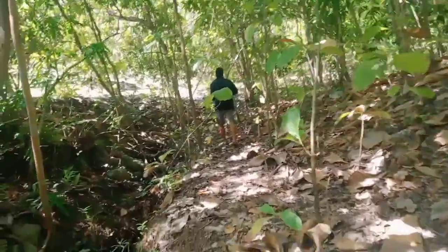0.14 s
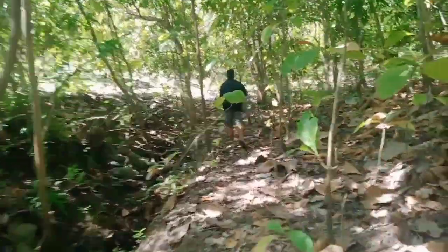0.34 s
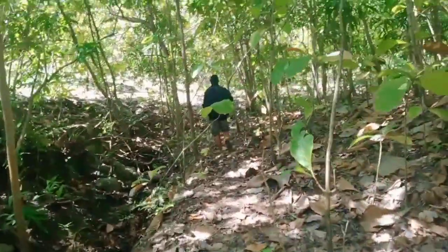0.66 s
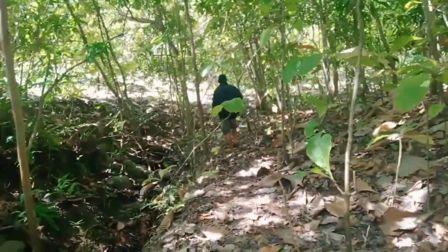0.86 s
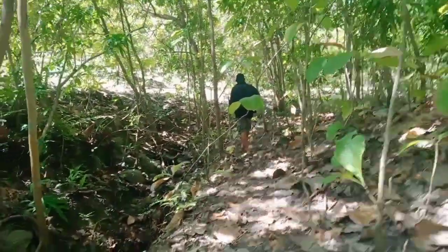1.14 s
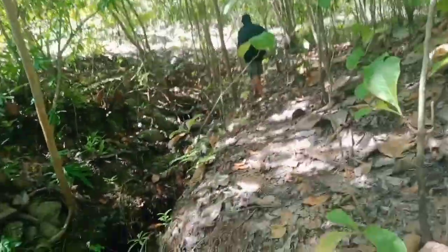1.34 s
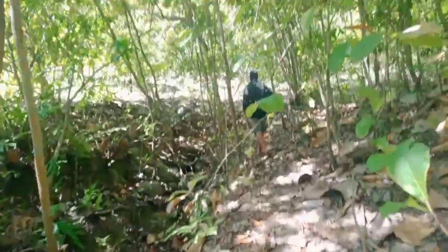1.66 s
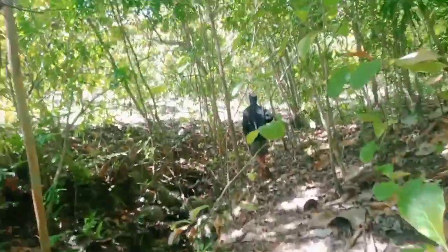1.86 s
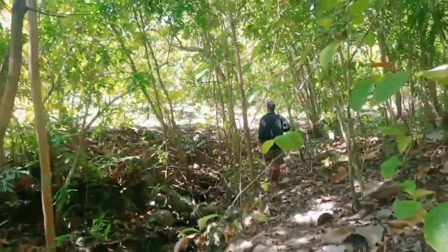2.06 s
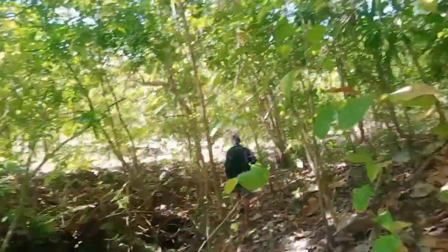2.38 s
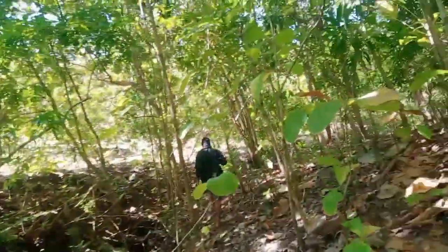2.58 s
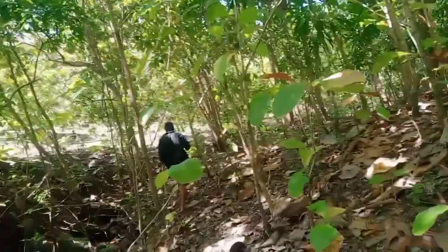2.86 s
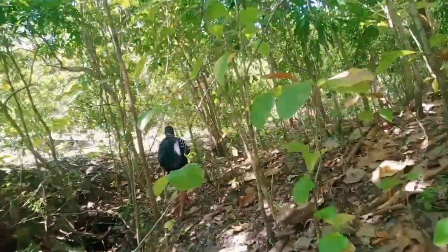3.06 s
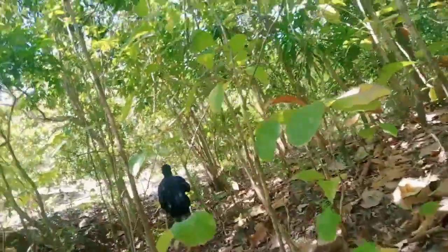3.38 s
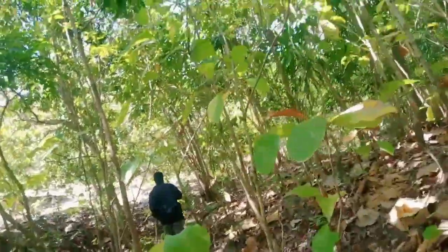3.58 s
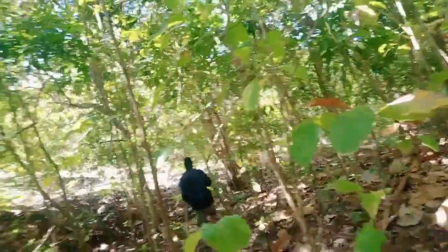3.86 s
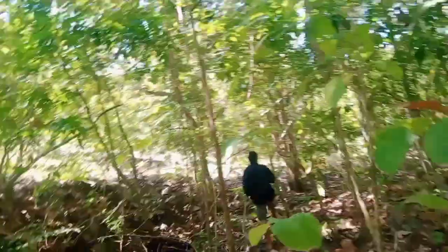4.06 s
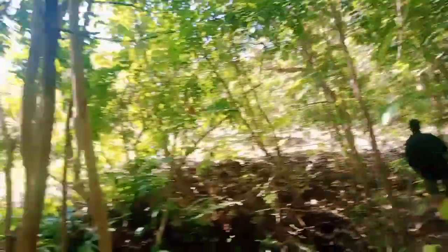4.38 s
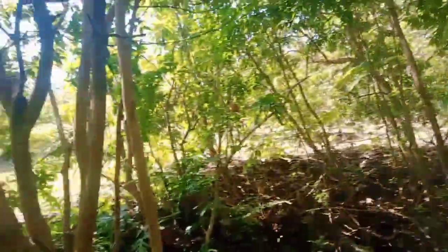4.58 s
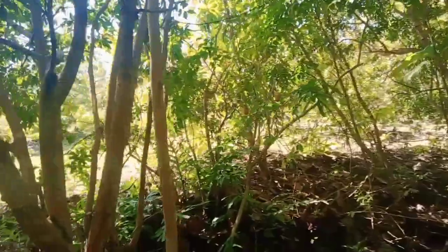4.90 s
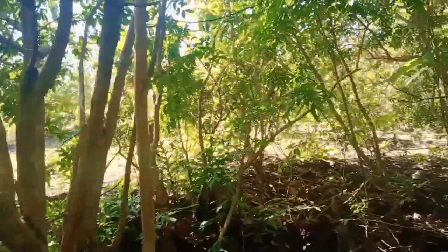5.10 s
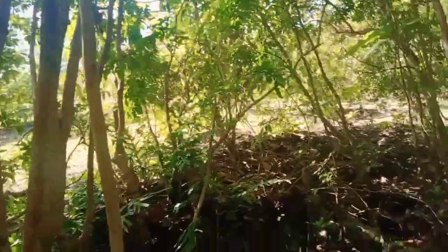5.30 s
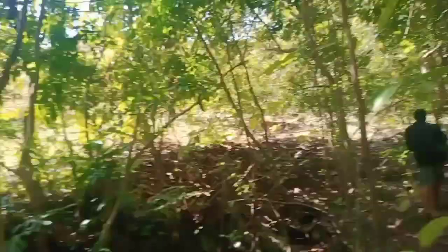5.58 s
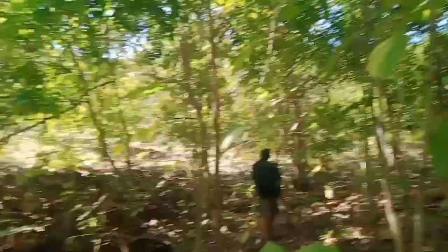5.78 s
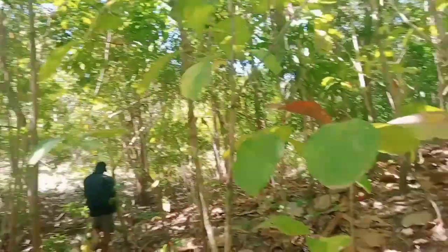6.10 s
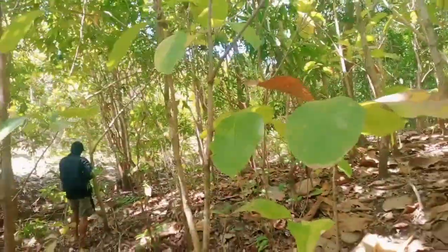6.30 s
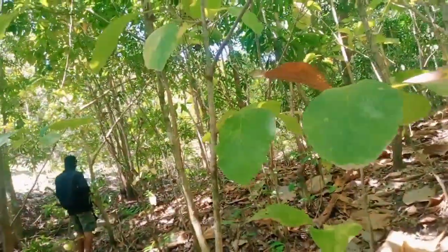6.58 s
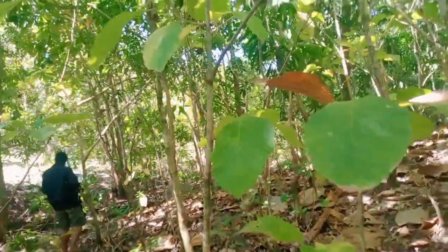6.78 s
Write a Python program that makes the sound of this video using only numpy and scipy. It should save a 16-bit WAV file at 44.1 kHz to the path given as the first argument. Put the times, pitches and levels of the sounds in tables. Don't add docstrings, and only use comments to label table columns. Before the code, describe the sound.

Feet move through dry leaf litter on a forest path, near the microphone and further off. Heavy crunches with low hollow thuds open the scene; loud single twig cracks follow around the middle; then faint scuffing leaves room for high, breathy bird pipes. Crisp steps and snapping stems return strongly near the end, over faint hiss and soft handling bumps.

```python
import sys
import numpy as np
from scipy import signal
from scipy.io import wavfile
from scipy.ndimage import uniform_filter1d, minimum_filter1d

SR = 44100
rng = np.random.default_rng(int(sys.argv[2]) if len(sys.argv) > 2 else 0)


def waveform_to_disk(signal):
    frames = np.transpose(np.atleast_2d(signal))
    scaled = np.clip(frames, -1, 1) * 32767
    samples = np.round(scaled).astype(np.int16)
    wavfile.write(sys.argv[1], SR, samples)


N = 306390

# (frequency [Hz], level per Hz [dB])
LITTER_TONE = [(150, -54), (250, -23.5), (360, -36.5), (399, -18), (436, -20), (483, -8), (627, -11.5),
               (1100, 0), (2600, 2.5), (3620, -1.5), (5300, -12), (7360, -18.5), (10600, -28.5),
               (15800, -30.5)]


def from_db(db):
    return 10 ** (np.asarray(db) / 20)


def rms_one(x):
    return x / np.sqrt(np.mean(x ** 2) + 1e-20)


def in_time(rows):
    s, *columns = np.transpose(rows)
    return [np.interp(np.arange(N) / SR, s, c) for c in columns]


def at_hz(points, hz, column=1):
    points = np.array(points)
    return np.interp(np.log(hz), np.log(points[:, 0]), points[:, column])


def band(x, low, high, order=2):
    return signal.sosfilt(signal.butter(order, [low, min(high, .45 * SR)], "band", fs=SR, output="sos"), x)


def drift(rate_hz):
    r = np.exp(-40 * np.pi * rate_hz / SR)
    noise = rng.standard_normal(N // 20 + 2002)
    slow = signal.lfilter([1], [1, -2 * r, r * r], noise)[2000:]
    return np.interp(np.arange(N) / 20, np.arange(len(slow)), rms_one(slow))


def ring(hz, t60, rise_cycles):
    t = np.arange(2000) / SR
    return from_db(-60 * t / t60) * (1 - np.exp(-t * hz / rise_cycles)) * np.sin(2 * np.pi * hz * t)


def clicks_in_band(rows, low_hz, high_hz, edge_low_hz, edge_high_hz, gain_db):
    clicks = np.zeros(N)
    clicks[[round(s * SR) for s, db in rows]] = from_db(np.array(rows)[:, 1] + gain_db)
    return band(band(clicks, low_hz, high_hz), edge_low_hz, edge_high_hz)


def treble_clicks(rows, low_hz, high_hz):
    return clicks_in_band(rows, low_hz, high_hz, 0.89 * low_hz, 0.72 * high_hz, gain_db=24.0)


def husky_notes(rows, width_hz, fade):
    out, a, b = np.zeros(N), drift(width_hz), drift(width_hz)
    for start, end, hz0, hz1, db in rows:
        at = slice(round(start * SR), round(end * SR))
        part = np.linspace(0, 1, at.stop - at.start)
        phase = 2 * np.pi * np.cumsum(hz0 + (hz1 - hz0) * part) / SR
        shape = np.sqrt(np.clip(9.8 * part, 0, 1)) * (1 - part) ** fade
        out[at] += from_db(db) * shape * (a[at] * np.sin(phase) + b[at] * np.cos(phase))
    return out


def bumps(length_s):
    # (time [s], peak level [dB],
    # frequency [Hz])
    swells = [(0.42, -46.5, 169), (1.25, -48, 70), (1.274, -52, 109), (1.599, -48, 102), (1.64, -47, 65),
              (2.73, -51, 70), (5.501, -47, 189), (5.599, -54, 173), (6.49, -45, 65), (1.679, -50, 115),
              (2.46, -42.5, 73.0), (3.07, -43.5, 109), (3.294, -47, 246), (3.538, -43.5, 134),
              (4.37, -49, 236), (5.551, -42, 123), (5.71, -46, 65.0), (6.171, -36.5, 62.3), (6.249, -46, 86),
              (6.284, -43, 220), (6.346, -46.5, 142), (6.449, -44.5, 111), (6.548, -42, 155),
              (6.686, -47, 254)]
    out, t = np.zeros(N), np.arange(-4000, 4000) / SR
    for (s, db, hz), turn in zip(swells, rng.random(len(swells))):
        i = round(s * SR)
        wave = np.sin(2 * np.pi * (hz * t * (1 - 1.2 * t) + turn))
        out[i - 4000:i + 4000] += from_db(db) * np.exp(-(t / length_s) ** 2) * wave
    return out


def air(patchy_db):
    # (frequency [Hz], level per Hz [dB])
    air_tone = [(15, -41), (25, -15), (152, -5.5), (672, -13), (1060, -50), (1360, -24), (1470, -25),
                (2810, -0.5), (3490, -8), (4820, -17), (6310, -33), (15800, -22)]
    edges, white, hiss = 22 * 2 ** np.arange(0, 9.6, .5), rng.standard_normal((3, N)), 0
    for k, (low, high) in enumerate(zip(edges, edges[1:])):
        level = from_db(at_hz(air_tone, np.sqrt(low * high)) + patchy_db * drift(7.8))
        hiss = hiss + level * band(white[k % 2], low, high)
    lumps = rms_one(band(white[2], 50, 155) * from_db(5.2 * drift(4.5)))
    return from_db(-48.5) * rms_one(hiss) + from_db(-60.5) * lumps


def birds():
    # (start [s], end [s], start pitch [Hz], end pitch [Hz], level [dB])
    calls = [
        (.065, .19, 8500, 8450, -53),
        (2.0, 2.2, 8800, 8340, -65),
        (4.35, 4.5, 9300, 9550, -68),
        (4.5, 4.56, 8800, 8500, -58),
        (4.59, 4.69, 8200, 8020, -53),
        (4.715, 4.79, 7800, 7600, -54),
        (4.715, 4.78, 6600, 6500, -54),
        (5.705, 5.87, 8500, 8500, -52.5),
        (6.93, 6.947, 8600, 8600, -47),
    ]
    return husky_notes(calls, 190.0, fade=0.69)


def trees(x, t60, start_s):
    t = np.arange(int(.3 * SR)) / SR
    tail = band(rng.standard_normal(len(t)), 240, 6000) * from_db(-60 * t / t60) * (t > start_s)
    return signal.fftconvolve(x, tail / np.sqrt(np.sum(tail ** 2)))[:N]


def drags():
    # (start [s], end [s], start pitch [Hz], end pitch [Hz], level [dB])
    hollow_drags = [
        (.04, .14, 639, 670, -50),
        (.65, .74, 618, 618, -49.5),
        (.76, .83, 604, 583, -49.5),
        (.93, 1.02, 562, 601, -44.5),
        (1.04, 1.2, 600, 629, -53.5),
        (3.4, 3.47, 756, 755, -41),
    ]
    return husky_notes(hollow_drags, 51.0, fade=0.21)


def streaks():
    # (start [s], end [s], start pitch [Hz], end pitch [Hz], level [dB])
    narrow_streaks = [(.99, 1.05, 1159, 1080, -40.5), (1.09, 1.13, 1040, 990, -45.5),
                      (1.935, 1.97, 1400, 1440, -43), (2.0, 2.09, 1604, 1890, -46),
                      (2.25, 2.34, 1300, 1340, -53), (2.3, 2.4, 2690, 2800, -60),
                      (4.405, 4.46, 2570, 2630, -57), (4.44, 4.48, 3450, 3420, -48),
                      (4.66, 4.73, 1463, 1590, -45), (4.99, 5.08, 1190, 1245, -52.5),
                      (5.1, 5.2, 1255, 1140, -48), (5.36, 5.46, 1243, 1193, -45),
                      (6.1, 6.13, 1300, 1300, -39), (6.24, 6.35, 852, 798, -44)]
    return husky_notes(narrow_streaks, 52.0, fade=0.46)


def fine_ticks():
    # (time [s], peak level [dB])
    thin_edges = [(0.2788, -38), (0.2897, -38), (0.3189, -26), (0.3524, -26), (0.4229, -24), (0.471, -16),
                  (1.1666, -42), (1.6249, -38), (1.7656, -42), (2.4486, -43), (3.1802, -25), (4.5661, -51),
                  (5.5918, -36), (5.7594, -44.0), (6.363, -36), (6.5528, -29), (6.6641, -38)]
    return treble_clicks(thin_edges, 10700, 18400)


def crisp_cracks():
    # (time [s], peak level [dB])
    curled_leaves = [(0.2666, -24), (0.2899, -11), (0.3328, -18), (0.3555, -24), (0.3946, -12),
                     (0.4228, -9), (0.4292, -12), (0.4339, -10), (0.7212, -36), (0.9196, -33),
                     (1.1644, -33), (1.3075, -36), (1.4203, -31), (1.4354, -28), (1.6248, -51),
                     (3.2178, -35), (3.4154, -28), (3.7259, -35), (3.9779, -47), (4.5664, -30),
                     (4.8394, -46), (4.8669, -44), (6.4627, -40), (6.518, -26), (6.8179, -34)]
    return treble_clicks(curled_leaves, 7400, 10400)


def pops(low_hz, high_hz, gain_db):
    # (time [s], peak level [dB])
    stems = [(.2787, -5), (0.289, -3), (.319, -7), (.3262, -2), (.3804, -4), (.4711, 3.5), (1.42, -7),
             (1.467, -18), (2.4677, -12), (2.4999, -4.5), (3.1803, 0.5), (3.438, -20), (3.8333, -14),
             (4.8387, -9), (5.5904, -15), (5.835, -18), (6.3633, 0.5), (6.41, -1.5), (6.4992, -18),
             (6.5531, 1.5), (6.5565, -3), (6.6415, -16), (6.663, -9), (6.7765, -1.5), (6.8078, -11),
             (6.8248, -12)]
    return clicks_in_band(stems, low_hz, high_hz, 0.48 * low_hz, 1.22 * high_hz, gain_db)


def thuds():
    # (time [s], peak level [dB], pitch [Hz])
    hollow_leaves = [(0.292, -31, 503), (0.314, -22, 550), (0.403, -14, 605), (0.418, -13, 500),
                     (0.442, -20, 470), (0.463, -19, 520), (1.364, -15, 418), (1.39, -22, 490),
                     (1.422, -20.5, 500), (1.438, -21.5, 304), (3.179, -16, 580), (6.365, -19, 770),
                     (6.553, -37, 706), (6.713, -26.5, 584)]
    out = np.zeros(N + 2000)
    for s, db, hz in hollow_leaves:
        i = round(s * SR)
        out[i:i + 2000] += from_db(db + 2.0) * ring(hz, 12.5 / hz, 0.68)
    return out[:N]


def crumples(spread_db):
    # (time [s], level [dB], centre frequency [Hz], length [ms])
    crumpling_leaves = [(0.229, -26.5, 3030, 10), (.298, -18, 2480, 5.1), (.41, -17, 2800, 26),
                        (.444, -22, 2500, 5.1), (0.465, -21, 2900, 5.9), (.75, -32.5, 3240, 10),
                        (1.006, -34, 3700, 4.2), (1.277, -23.5, 2100, 9), (2.513, -27, 2300, 3.1),
                        (3.196, -21, 2100, 6.8), (3.218, -37, 2380, 5.5), (3.256, -23, 2500, 3.7),
                        (3.332, -27, 2040, 14), (4.683, -43, 1490, 19), (4.835, -27, 2400, 4.6),
                        (4.85, -25, 2280, 4.5), (6.238, -22.5, 2570, 12), (6.309, -14.5, 2200, 2.5),
                        (6.34, -25, 2580, 6.6), (6.456, -18, 2560, 12), (6.47, -24, 2430, 6),
                        (6.487, -18, 2680, 4.1), (6.667, -20, 3750, 2.2), (6.677, -27, 2200, 5.9),
                        (6.696, -28, 3020, 8), (6.805, -35, 1500, 3.6), (.27, -21.5, 3340, 10),
                        (.426, -16, 2980, 13), (0.384, -19, 2900, 17), (3.58, -31, 2400, 18),
                        (5.22, -43, 3100, 14), (1.267, -27, 2580, 4.3), (1.421, -17, 1600, 3.1),
                        (1.441, -22, 2300, 6.2)]
    breaks_per_s, width = 5000, 1.24
    out, t = np.zeros(N + 2000), np.arange(-1000, 1000) / SR
    chances = rng.random((len(crumpling_leaves), 2, 2000))
    for (s, db, hz, ms), (born, size) in zip(crumpling_leaves, chances):
        sizes = np.sign(size - .5) * from_db(spread_db * abs(2 * size - 1))
        breaks = sizes * (born < breaks_per_s / SR)
        rush = rms_one(band(breaks, hz / width, hz * width))
        i = round(s * SR)
        out[i - 1000:i + 1000] += from_db(db) * rush * np.exp(-(2e3 * t / ms) ** 2)
    return out[:N]


def snap_list():
    # (time [s], peak level [dB], ring pitch [Hz], sharp edge level [dB])
    brittle = [(0.231, -12, 2920, -10), (0.278, -1.5, 3360, 2.5), (.319, -3.5, 2840, 4),
               (.326, -6.5, 2050, 6), (.3522, -10, 4040, 6), (0.4189, 5, 2770, -10), (0.442, 4, 2570, -10),
               (0.4712, 3.5, 3300, -15), (0.7451, -15, 3500, -27), (.896, -17, 4220, -5),
               (1.166, -7.5, 2610, -16), (1.3266, -10, 2470, -8), (1.3293, -10, 2380, -10),
               (1.361, -11, 1450, -3), (1.3887, -10, 1400, -15), (1.411, -21, 2830, 4),
               (1.766, -13.5, 4650, -18), (2.245, -26, 2620, -16), (2.4998, -24, 2840, -14),
               (3.255, -8.5, 2550, -19), (3.378, -15, 2260, -11), (3.463, -16, 3980, -14),
               (3.853, -14.5, 3360, -9), (4.075, -28.5, 2640, -5), (5.59, -34, 2870, -13.5),
               (5.8344, -14.5, 2700, -11), (6.03, -16, 3250, -4), (6.3635, -1.5, 2050, -15),
               (6.664, -15.5, 3000, 4), (6.763, -18.5, 5100, 1)]
    # (time [s], peak level [dB], ring pitch [Hz])
    twigs = [(0.4645, -5, 2950), (0.5415, -14.5, 1940), (0.7333, -17, 3190), (1.2635, -6, 2770),
             (1.2775, -13, 2060), (1.4368, -10, 2330), (1.4667, -24, 3310), (1.598, -12, 2370),
             (1.6975, -15, 3450), (2.444, 12.5, 1970), (2.4484, 6.5, 1920), (2.4674, -18, 1910),
             (3.098, -17, 2090), (3.1797, 9, 1680), (3.2286, -4, 2600), (3.833, -11, 3850),
             (4.0945, -24, 2770), (4.8378, -8, 2480), (4.889, -15, 2250), (5.1343, -12.5, 2030),
             (5.5312, -18.5, 3500), (6.3933, -6, 1900), (6.4438, -4, 1740), (6.4738, 1, 2500),
             (6.5524, 7.5, 2400), (6.5556, 8.5, 1650), (6.571, -7, 3250), (6.636, -11, 3060),
             (6.7765, -3, 2840), (6.8079, -5.5, 1940)]
    # (time [s], peak level [dB], ring pitch [Hz])
    broad = [(0.05, -18, 4600), (1.006, -22, 4160), (1.018, -23.5, 1170), (1.2036, -19.5, 3130),
             (1.275, -15.5, 1800), (1.4219, -3.5, 1620), (1.507, -13, 1800), (1.574, -18, 2960),
             (2.4374, -17, 2080), (2.9088, -13.5, 1650), (3.024, -14.5, 2500), (3.1976, -17, 2450),
             (3.617, -21, 1980), (3.6333, -20, 4320), (3.7284, -18, 2100), (3.828, -17, 1870),
             (4.326, -21, 3730), (4.8505, -9.5, 2270), (6.233, -7.5, 2250), (6.239, -12, 2060),
             (6.3104, -4, 2080), (6.404, -3.5, 1770), (6.4085, -2, 1160), (6.415, -5.5, 2630),
             (6.4992, -8, 2520), (6.5446, -12, 1330), (6.5772, -14, 1860), (6.602, -16.5, 3020),
             (6.8233, -6.5, 1800), (6.8565, -24, 2130)]
    # (time [s], peak level [dB], ring pitch [Hz])
    strays = [(0.213, -19, 1820), (0.3716, -3.5, 1880), (0.6115, -28, 3540), (0.6574, -24, 1610),
              (0.7063, -23, 2780), (0.719, -26, 2820), (0.865, -28, 1560), (0.955, -18, 1170),
              (1.0999, -31, 2420), (1.2418, -25, 2190), (1.3086, -16, 2200), (1.3468, -17, 1740),
              (1.624, -22, 1680), (1.982, -24, 2220), (2.8604, -30, 2280), (3.149, -30, 1750),
              (3.3892, -13, 2500), (3.437, -18, 4550), (3.6778, -17.5, 1970), (4.1558, -29.5, 1490),
              (4.411, -30, 2400), (4.4504, -37, 3510), (4.519, -27, 3440), (4.6518, -24, 2080),
              (4.9844, -28, 3650), (5.1612, -24, 1920), (5.3353, -20.5, 2580), (5.372, -25.5, 1290),
              (5.607, -24, 1570), (5.759, -21, 4100), (5.7767, -22, 1650), (5.9903, -28, 2480),
              (6.108, -27, 1300), (6.641, -23, 1840), (6.8454, -21, 2100)]
    rows = [(*row, .0055) for row in brittle]
    rows += [(*row, -35, 0.003794) for row in twigs]
    rows += [(*row, -36, .0095) for row in broad]
    rows += [(*row, -11, 0.0051) for row in strays]
    return rows


def snaps(second_db, edge_db):
    tear_share, tear_loss_db = .4, 10
    out, edges = np.zeros(N + 4000), np.zeros(N)
    rows = snap_list()
    for (s, db, hz, sharp_db, t60), (a, b, c) in zip(rows, rng.random((len(rows), 3))):
        i, size = round(s * SR), np.sign(a - .5) * from_db(db)
        above = ring(hz * (1.135 + 0.68 * b), 0.64 * t60, 0.23)
        below = ring(hz * (0.48 + 0.12 * c), 0.35 * t60, 0.38)
        crack = size * from_db(-1.0) * (ring(hz, t60, 0.29) + from_db(second_db) * (above - below))
        for k, gap in enumerate(np.cumsum([0, 0.408 + a, 0.42 + c]) * tear_share * t60):
            j = i + round(gap * SR)
            out[j:j + 2000] += crack * from_db(-tear_loss_db * k) * np.sign(b - .5) ** k
        splinters = np.array([1, 2 * b - 1, 2 * c - 1, a, b - c, a - b])
        edges[i + 4:i + 70:13] += size * from_db(sharp_db + edge_db - 5.0) * splinters
    body = band(band(out[:N], 670, 5040), 470, 6100)
    return body + band(band(edges, 5300, 12500), 7700, 8500)


def pockets(level, per_s, t60):
    pitches = np.geomspace(700, 3800, num=22)
    cracks = (rng.random(N) < per_s / SR) * rng.uniform(0.12, 1.16, N) * level
    dealt, r, out = rng.integers(0, len(pitches), N), from_db(-60 / (t60 * SR)), 0
    for k, hz in enumerate(pitches):
        w = 2 * np.pi * hz / SR
        hits = cracks * (dealt == k) + 1e-18
        ringing = signal.lfilter([0, np.sin(w)], [1, -2 * r * np.cos(w), r * r], hits)
        out = out + from_db(1.22 * at_hz(LITTER_TONE, hz)) * ringing
    return out


def nearness():
    # (start [s], end [s], lift [dB])
    brushes = [
        (0.202, 0.332, 18),
        (0.685, 0.75, -9),
        (1.636, 1.83, 39),
        (3.354, 3.506, 32),
        (4.476, 4.594, 66),
        (4.973, 5.008, 41),
        (5.144, 5.246, 36),
        (5.588, 5.63, 34),
        (5.77, 5.797, 8),
        (6.543, 6.95, 13),
    ]
    edge_s, far_db = 0.082, -35.5
    t = np.arange(N) / SR
    near = far_db
    for start, end, db in brushes:
        near = near + db * np.clip(np.minimum(t - start, end - t) / edge_s + .5, 0, 1)
    return near


def tread():
    # (time [s], crunch level [dB], crispness [dB], weight [dB])
    shuffle = [(0, -35.5, -5.5, -27), (.18, -34.5, -11, -30), (.6, -39.5, -10, -14),
               (.9, -36.5, -17.5, -13), (1.5, -40, -8.5, -28), (1.77, -39.5, -8.5, -35),
               (2.12, -44.5, -5.5, -29), (2.4, -52, -20, -37), (2.65, -39.5, -15, -59),
               (2.9, -34.5, -20.5, -38), (3.12, -40.5, -8.5, -41), (4.0, -42, -13, -51),
               (4.3, -53.5, -12, -44), (4.65, -45, -4, -33), (5.04, -43.5, -4.5, -45),
               (5.45, -42, -16.5, -18), (5.9, -40.5, -10.5, -47), (6.947, -40, -3, -28)]
    # (time [s], crunch level [dB], swell [ms], settle [ms], big-leaf weight [dB])
    steps = [(0.285, -18.5, 82, 190, -19), (0.405, -15.5, 57, 89, 4.5), (0.443, -15, 79, 23, 3.5),
             (1.271, -30.5, 26, 47, 2), (1.364, -28, 69, 185, 11), (1.43, -24, 39, 60, 13),
             (2.451, -25, 38, 52, -7), (3.191, -27, 38, 82, 8), (3.255, -23.5, 160, 50, -7),
             (3.437, -31, 280, 1050, -12.5), (4.846, -30, 41, 33, -19), (6.239, -23, 78, 290, -27),
             (6.338, -26.5, 61, 120, -3), (6.405, -22.5, 220, 31, 1), (6.465, -19.5, 120, 220, 1),
             (6.674, -27, 60, 130, -6), (6.82, -33, 210, 210, -1)]
    # (time [s], crunch level [dB], swell [ms], settle [ms])
    scuffs = [(.749, -32, 48, 94), (1.515, -32.5, 62, 38), (2.267, -43.5, 160, 280), (2.49, -29.5, 22, 160),
              (3.331, -36, 63, 28), (3.84, -37, 41, 180), (4.526, -43.5, 62, 110), (4.66, -42, 23, 220),
              (5.0, -50, 20, 92), (.9, -39.5, 15, 140), (.96, -41, 18, 220), (1.11, -53, 40, 100),
              (1.7, -37.5, 190, 250), (2.92, -35.5, 30, 130), (4.09, -41, 33, 290), (5.6, -44, 40, 100),
              (4.871, -32.5, 19, 250), (5.169, -38, 180, 180), (5.374, -37, 31, 33), (5.79, -37, 1250, 140),
              (6.032, -36, 200, 390)]
    # (time [s], crispness [dB])
    dryness = [
        (.3, -12),
        (3.2, -17),
        (4.8, -8),
        (6.42, -15.5),
        (6.7, -10.5),
    ]
    scuff_weight_db, scuff_crisp_db = -13, -12.5
    swing_db = 20
    t, (level_db, crisp_db, far_weight_db) = np.arange(N) / SR, in_time(shuffle)
    power = from_db(2 * level_db)
    weight, crisp = power * far_weight_db, power * crisp_db
    presses = [(*row, np.interp(row[0], *np.transpose(dryness))) for row in steps]
    presses += [(*row, scuff_weight_db, scuff_crisp_db) for row in scuffs]
    for s, db, swell_ms, settle_ms, weight_db, press_crisp_db in presses:
        away = 1e3 * np.maximum((s - t) / swell_ms, (t - s) / settle_ms)
        press = from_db(2 * (db - swing_db * away))
        power = power + press
        weight = weight + press * weight_db
        crisp = crisp + press * press_crisp_db
    return np.sqrt(power), (weight / power, crisp / power, nearness())


def clumps(per_s, t60, depth):
    starts = (rng.random(N) < per_s / SR) * np.minimum(rng.exponential(1, N), 2)
    falls = signal.lfilter([1], [1, -from_db(-60 / (t60 * SR))], starts + 1e-18)
    return (1 + depth * falls) / np.mean(1 + depth * falls)


def crunch(level, colour_db, per_s, spread_db, rustle, patchy_db):
    usual_db = [-7, -17.5, -33]
    # (frequency [Hz], weight share [1], crispness share [1], nearness share [1])
    reach = [(550, 1, 0.14, 0.23), (1300, 0.02, 0.16, 0.042), (3160, 0.035, 0.45, 0.12),
             (5100, 0.055, 0.96, 0.18), (9650, 0.0011, 0.69, 0.19), (10140, 0.0051, 0.96, 0.25)]
    # (frequency [Hz], share of the faintness lost [1])
    thinning = [(600, 0.018), (900, 0.3), (1300, 0.53), (1900, 0.27), (2600, 0.078)]
    faint_start_db, faint_patch = -34, 0.022
    clump = clumps(per_s=220, t60=.02, depth=.7)
    sizes = from_db(spread_db * np.minimum(rng.exponential(1, N), 4.5)) * rng.choice([-1, 1], N)
    cracks = rms_one(sizes * (rng.random(N) < per_s * clump / SR))
    edges = 250 * 2 ** np.arange(0, 6.01, 1 / 5)
    centre = rng.integers(-2, len(edges) + 1, N)
    white, out = rng.standard_normal((2, N)) * np.sqrt(clump), 0
    faint_db = np.maximum(faint_start_db - 20 * np.log10(level), 0)
    for k, (low, high) in enumerate(zip(edges, edges[1:])):
        hz = np.sqrt(low * high)
        heard_cracks = cracks * (abs(centre - k) <= 2) * np.sqrt(len(edges) / 5)
        source = heard_cracks + rustle * white[k % 2]
        shift_db = sum(at_hz(reach, hz, column=c + 1) * (colour_db[c] - usual_db[c]) for c in range(3))
        tone_db = at_hz(LITTER_TONE, hz) + shift_db - at_hz(thinning, hz) * faint_db
        patches_db = patchy_db * (1 + faint_patch * faint_db) * drift(5.3)
        out = out + from_db(tone_db + patches_db) * band(source, low, high, order=3 if k < 14 else 2)
    return level * from_db(-1.95) * out / np.sqrt(np.mean(band(out, 710, 7500) ** 2))


def scene():
    background = air(patchy_db=2.0) + bumps(length_s=0.015) + birds()
    breaks = snaps(second_db=-6.5, edge_db=11.5) + crisp_cracks() + crumples(spread_db=29.0)
    breaks += pops(low_hz=1300, high_hz=4800, gain_db=10.0)
    level, colour_db = tread()
    litter = crunch(level, colour_db, per_s=1500.0, spread_db=3.0, rustle=1.0, patchy_db=2.0)
    litter += from_db(-6) * pockets(level, per_s=150, t60=.13)
    feet = litter + breaks + thuds() + fine_ticks() + drags() + streaks()
    scatter = from_db(-17.5) * trees(breaks, t60=0.12, start_s=0.0029)
    return (feet + scatter + background)[None]


def roll_off(x):
    return signal.sosfilt(signal.butter(12, 16240, fs=SR, output="sos"), x)


def record(dry):
    below = signal.sosfiltfilt(signal.butter(8, 9350, fs=SR, output="sos"), dry)
    heard = below + from_db(-9.0) * (dry - below)
    room_left = np.minimum(1, .99 / (abs(heard) + 1e-9))
    gain = uniform_filter1d(minimum_filter1d(room_left, size=41), size=21)
    cut = signal.sosfilt(signal.cheby2(10, 30, 16000, fs=SR, output="sos"), heard * gain)
    return roll_off(cut)


dry = scene()
out = record(dry)
waveform_to_disk(out)
```